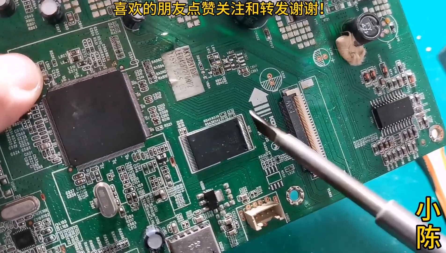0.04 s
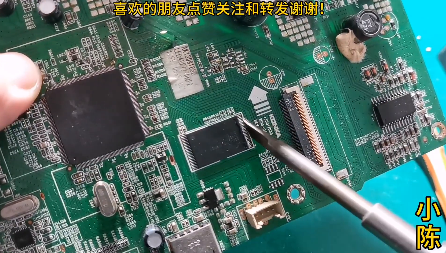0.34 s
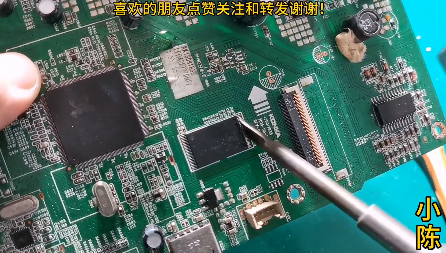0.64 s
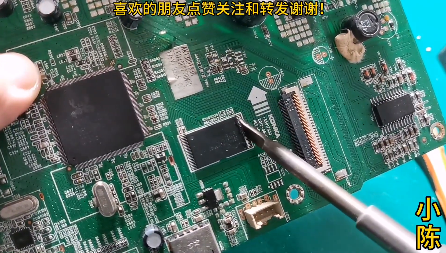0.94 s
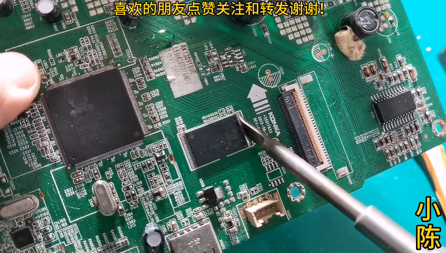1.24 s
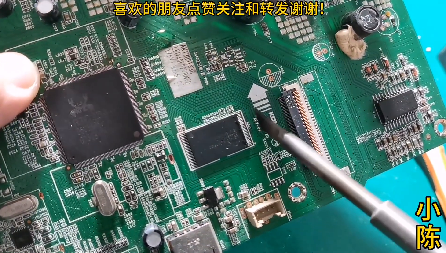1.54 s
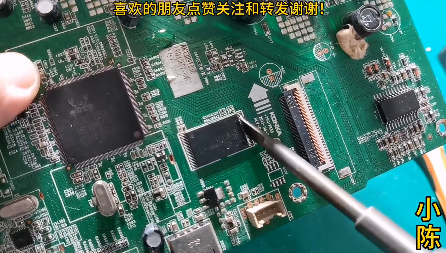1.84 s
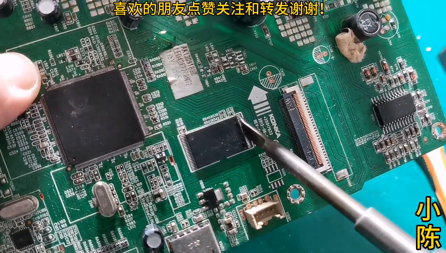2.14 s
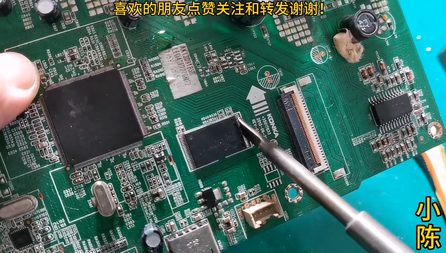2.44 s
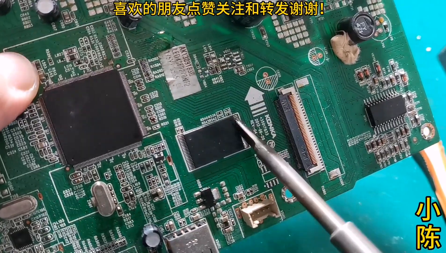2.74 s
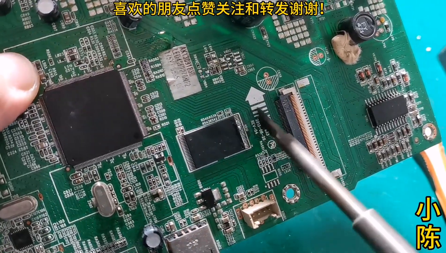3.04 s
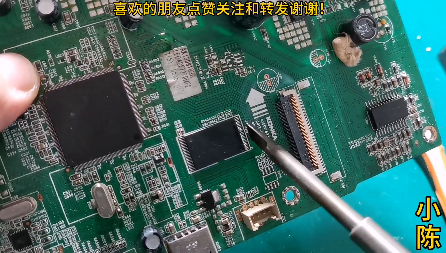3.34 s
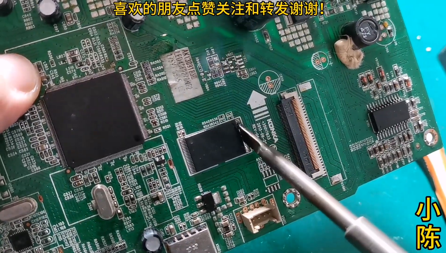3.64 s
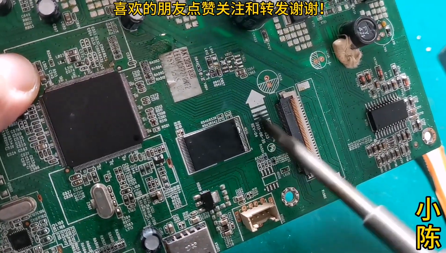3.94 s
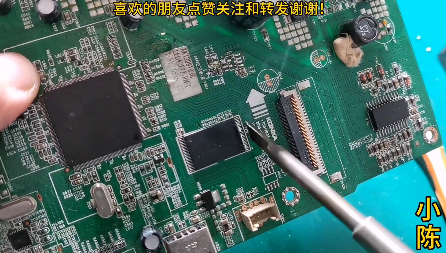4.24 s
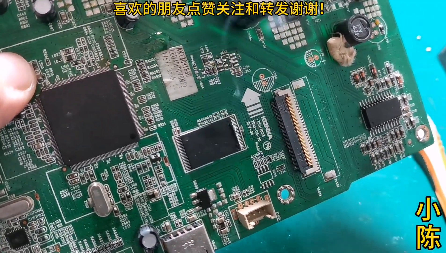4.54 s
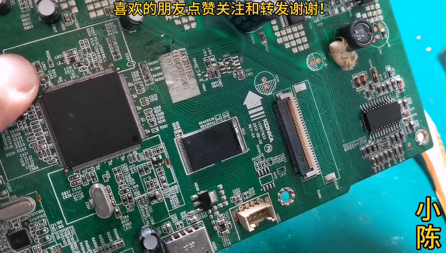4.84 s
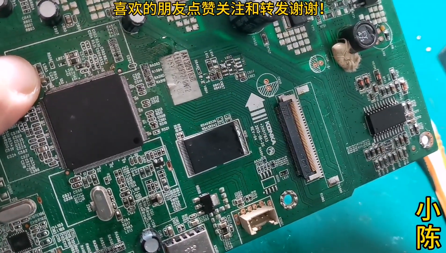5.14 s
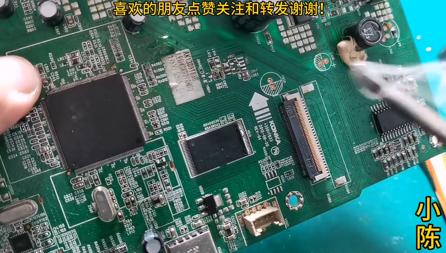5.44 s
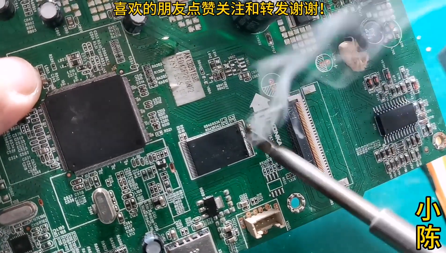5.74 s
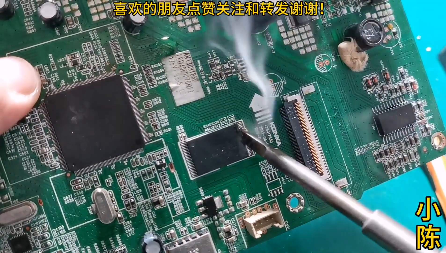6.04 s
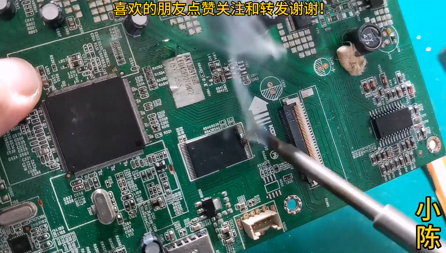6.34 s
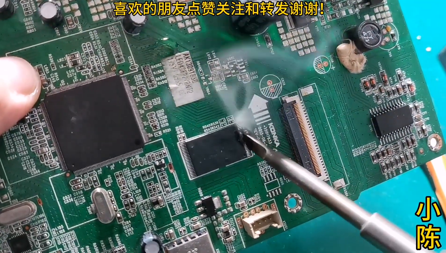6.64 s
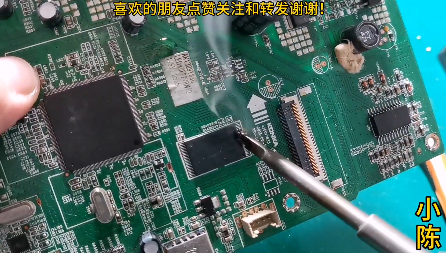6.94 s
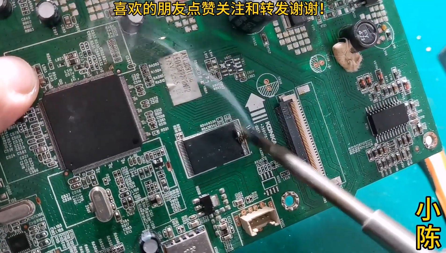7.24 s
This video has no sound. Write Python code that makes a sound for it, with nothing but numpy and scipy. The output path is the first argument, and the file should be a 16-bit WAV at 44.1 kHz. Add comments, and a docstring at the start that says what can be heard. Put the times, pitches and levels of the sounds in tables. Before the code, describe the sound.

Small clicks and a light rasp of a soldering iron on a circuit board, then flux hisses and spits briefly before more clicks.

```python
"""In a small room, a soldering iron works along the pins of a circuit board on a bench, near a phone.
Each impact excites the normal modes of board and bench: the tip ticks and skips over the pins, and once
drags across them with a rasp of tiny slips. Dipped in flux, it raises bubbles that burst in a hiss,
with puffs of vapour and spitting droplets; then it returns to the pins.
A low room rumble and mains hum lie underneath."""
import sys
import numpy as np
from scipy import signal
from scipy.fft import rfft, irfft, next_fast_len
from scipy.io import wavfile

SR = 44100
rng = np.random.default_rng(int(sys.argv[2]) if len(sys.argv) > 2 else 0)


def master(y):
    """Save y as 16-bit WAV."""
    cut = np.clip(np.atleast_2d(y).T, -1, 1)
    pcm = np.round(cut * 32767)  # scale
    wavfile.write(sys.argv[1], SR, pcm.astype(np.int16))


N = 330750

# room rumble: f/Hz, level/dB
RUMBLE_SPECTRUM = [(12, -16), (20, -2.5), (85, -5.5), (196, -2), (298, -7), (324, -5.5), (404, -7),
                   (478, -8.5), (581, -13), (746, -13.5), (1380, -22), (4680, -28.5), (5850, -34),
                   (11100, -37), (15500, -42)]
# likeness of the rumble at the two microphone ports: f/Hz, correlation
RUMBLE_COHERENCE = [(60, 0.3), (130, 0.61), (290, 0.69), (640, 0.25), (1410, -0.16), (3100, 0.082),
                    (6820, -0.054), (15000, -0.055)]
# balance of the rumble: f/Hz, left minus right/dB
RUMBLE_BALANCE = [(60, -2), (380, 1.5), (1300, -1), (5000, -0.5), (7600, -8), (9000, 3), (10500, 9.5),
                  (12500, 5.5), (15000, -2)]
# tones of the hum: f/Hz, level/dB
HUM_TONES = [(120, -74.5), (200, -74.5), (325, -75), (372, -76.5), (480, -76)]
# reverberation time of the room: f/Hz, t60/s
ROOM_DECAY = [(200, 0.077), (1000, 0.27), (4000, 0.24), (8000, 0.3), (14000, 0.28)]
# resonant response of each port: f/Hz, gain/dB
LEFT_RESPONSE = [(1000, -0.5), (3000, -2), (4600, 4), (5400, 0), (7000, -3), (7800, -20), (8850, 2),
                 (10000, 0.5), (11150, 4), (12650, 2), (14000, -4)]
RIGHT_RESPONSE = [(1000, -4.5), (3000, -3.5), (4500, 4), (6300, 5.5), (7050, 9.5), (7600, 8.5), (8200, 4),
                  (9300, -5.5), (10000, -10), (14000, -10)]

# short broad hisses: t/s, level/dB, t60/s
SHORT_HISSES = [(0, -51, 0.18), (0.624, -59.5, 0.12)]
# gentle simmer before and after the boil: start/s, stop/s, level/dB
SIMMER_SPANS = [(4.497, 4.77, -73.5), (5.465, 5.543, -66.5)]
# trains of vapour puffs: t/s, count, spacing/s, first level/dB
PUFF_TRAINS = [(4.788, 3, 0.03, -64), (5.359, 3, 0.021, -57.5), (5.437, 4, 0.021, -61),
               (5.603, 3, 0.033, -64.5)]
# bursting droplets of flux: t/s, level/dB, t60/s
DROPLET_BURSTS = [(4.976, -51.5, 0.039), (5.321, -32, 0.021), (5.5193, -38.5, 0.017), (5.538, -39, 0.01),
                  (5.5525, -55, 0.04), (6.0113, -39.5, 0.018)]
# spectra of the short hisses, the boil, the vapour and the droplets: f/Hz, level/dB
SHORT_HISS_SPECTRUM = [(400, -33), (1200, -7), (3000, -7.5), (6000, -5), (7700, -8), (8800, -6),
                       (10500, -14), (13000, -15), (14500, -34)]
BOIL_SPECTRUM = [(1500, -22), (3000, -8), (4500, -6), (6000, -6.5), (7300, 7), (8200, 0), (10000, 5.5),
                 (12000, 3), (14000, -2.5), (15500, -28)]
VAPOUR_SPECTRUM = [(2000, -23), (4000, -7), (6200, -9.5), (7100, 0), (7900, 5.5), (8600, -4.5),
                   (10500, -11), (15000, -20)]
DROPLET_SPECTRUM = [(800, -42), (2500, 1), (5000, -9), (7300, 15.5), (11000, 7.5), (13000, 10),
                    (15500, 6.5)]

# normal modes of the bench: f/Hz, level/dB, t60/s
BENCH_MODES = [(188.4, -8.5, 0.23), (218.4, -0.5, 0.16), (278.6, 3, 0.16), (348.7, -8.5, 0.24),
               (438.3, 1.5, 0.31), (457.7, -10, 0.24), (704, 0, 0.066), (785, -1.5, 0.1),
               (1103, -4.5, 0.36), (1091, -5.5, 0.28)]
# normal modes of the board: f/Hz, bandwidth/Hz, level/dB
BOARD_MODES = [(190, 61, -34), (278, 43, -6), (465, 29, 0.5), (710, 27, -5), (796.5, 32, 7),
               (1040, 130, -2), (1222, 235, 2.5), (1337, 35, 3), (1530, 220, 7.5), (1784, 198, 8.5),
               (2172, 340, 9.5), (2440, 1300, -33), (3140, 40, -1), (3880, 330, -6), (4710, 100, -14),
               (5110, 160, -16), (6000, 250, -53), (6700, 500, -53)]
# spectra of sliding friction and of impact noise: f/Hz, level/dB
RASP_SPECTRUM = [(400, -25), (750, -12), (1130, 4), (1450, -5.5), (1900, -5.5), (2360, 4.5), (2780, -6.5),
                 (3190, 2.5), (3530, -8), (4050, -7), (5300, -28), (7400, -23.5), (9000, -42), (14000, -37)]
CRACK_SPECTRUM = [(1000, -89), (2500, 12), (4500, -6.5), (7000, -3), (11000, -9.5), (15000, -35)]
# whistle of the slide, rising and falling with its speed: t/s, f/Hz
WHISTLE_PITCH = [(1.44, 10750), (1.56, 12240), (1.65, 12800), (1.74, 13850), (1.81, 12930), (1.87, 11500),
                 (1.93, 11300), (1.98, 9700)]
# thin tones of that whistle: ratio to its pitch, level/dB
WHISTLE_TONES = [(1, -82), (.63, -77), (.59, -81)]
# pushes on the bench, a softer one driving a lower pitch: t/s, level/dB, centre f/Hz
PUSHES = [(1.403, -44.5, 230), (2.254, -54.5, 940), (3.119, -40.5, 294), (4.078, -34.5, 450),
          (4.094, -43.5, 1030), (4.485, -49, 274), (4.523, -49.5, 350), (4.972, -41.5, 220),
          (5.258, -52, 630), (6.455, -38.5, 276), (6.46, -39, 784), (7.381, -51, 437), (7.388, -42, 188)]
# taps on single pins: t/s, level/dB, brightness/dB
PIN_TAPS = [(0.5978, -26, -3.5), (0.6656, -50.5, -11), (1.8743, -25, -4), (1.9229, -35, -4),
            (2.037, -45.5, -8), (2.0633, -35.5, 10), (2.2356, -51, 9), (2.2557, -29.5, -1),
            (3.1088, -36, 1), (3.7214, -48, -30), (4.5274, -53.5, 9), (4.9785, -48.5, 17),
            (5.3217, -40, 19.5), (6.0114, -40.5, 4.5), (6.0477, -48, 9), (6.5194, -39, -25),
            (6.7949, -54, 12), (7.3811, -33.5, -7)]
# skips: first t/s, last t/s, pins, slowing (1 = even), first level/dB, last level/dB, brightness/dB
PIN_SKIPS = [(1.4055, 1.4242, 2, 1, -36.5, -21, 2.5), (3.1178, 3.1807, 5, 1.38, -19.5, -34, -5.5),
             (4.0597, 4.0977, 4, 0.72, -19, -20.5, -1.5), (6.4359, 6.479, 3, 0.92, -21.5, -24, -0.5),
             (7.3877, 7.418, 3, 1.21, -24.5, -45, 0)]


def amp(db):
    """Amplitude ratio of a level in decibels."""
    return 10 ** (np.asarray(db) / 20)


def unit(x):
    """Normalisation to rms 1."""
    return x / np.sqrt(np.mean(x ** 2) + 1e-20)


def along(points, hz):
    """Interpolation of (f/Hz, value) points on a logarithmic frequency axis."""
    f, values = np.transpose(points)
    return np.interp(np.log(hz + 1), np.log(f + 1), values)


def wobble(rate):
    """Band-limited random fluctuation through rate knots a second."""
    knots = rng.standard_normal(int(N * rate / SR) + 4)
    fine = signal.resample(knots, len(knots) * 8)
    return np.interp(np.linspace(0, len(fine) - 1, N), np.arange(len(fine)), fine)


def swell(start_s, stop_s, attack_s, fade_db_per_s):
    """Envelope with an exponential approach from start_s and an exponential decay from stop_s."""
    t = np.arange(N) / SR
    rise = 1 - np.exp(-np.maximum(t - start_s, 0) / attack_s)
    return rise * amp(-fade_db_per_s * np.maximum(t - stop_s, 0))


def filtered(x, response):
    """Linear filtering: the spectrum of x times a frequency response."""
    size = x.shape[-1]
    padded = next_fast_len(size + 4096)
    return irfft(rfft(x, padded) * response(np.fft.rfftfreq(padded, 1 / SR)), padded)[..., :size]


def coloured(x, spectrum):
    """Spectral shaping by (f/Hz, level/dB) points, at rms 1."""
    return unit(filtered(x, lambda hz: amp(along(spectrum, hz))))


def noise(spectrum):
    """Two uncorrelated channels of coloured Gaussian noise."""
    return coloured(rng.standard_normal((2, N)), spectrum)


def grains(rate):
    """Shot noise: impulses of random size, on average rate a second, at rms 1."""
    return unit((rng.random((2, N)) < rate / SR) * rng.standard_normal((2, N)))


def add(track, s, sound):
    """Superposition of a sound on a track at s seconds."""
    start = max(round(s * SR), 0)
    part = track[:, start:start + sound.shape[-1]]
    part += sound[..., :part.shape[-1]]


def in_room(x, near_db, room_db, near_t60=0.029, apart_hz=900):
    """Reverberation: convolution with the direct path, scatter off the bench and the room's tail."""
    hz, t, spectra = signal.stft(rng.standard_normal((2, SR // 3)), SR, nperseg=256)
    tail = signal.istft(spectra * amp(-60 * t / along(ROOM_DECAY, hz)[:, None]), SR, nperseg=256)[1]
    t = np.arange(tail.shape[1]) / SR
    tail *= 1 - np.exp(-t / 0.00083)
    near = rng.standard_normal(tail.shape) * amp(-60 * t / near_t60) * (1 - np.exp(-t / 0.001))
    tail *= amp(room_db) / np.linalg.norm(tail[0])
    near *= amp(near_db) / np.linalg.norm(near[0])
    mid, side = tail + near
    side = filtered(side, lambda f: f / np.hypot(f, apart_hz))  # long waves reach both ports alike
    response = np.array([mid + side, mid - side]) / np.sqrt(2)
    response[:, 0] += 1  # direct path
    return signal.fftconvolve(x, response, axes=1)


def room_tone(rumble_db=-61.5):
    """Partial coherence: the rumble is most alike at both ports in the bass; a hum wavers in it."""
    angle = lambda hz: np.arccos(np.clip(along(RUMBLE_COHERENCE, hz), -1, 1)) / 2
    mid, side = filtered(noise(RUMBLE_SPECTRUM),
                         lambda hz: np.array([np.ones_like(hz), np.tan(angle(hz))]))
    balance = lambda hz: amp(np.outer([.5, -.5], along(RUMBLE_BALANCE, hz)))
    rumble = filtered(np.array([mid + side, mid - side]),
                      lambda hz: balance(hz) / np.sqrt(np.mean(balance(hz) ** 2, axis=0)))
    t = np.arange(N) / SR
    hum = sum(amp(db + 0.86 * wobble(3.4)) * np.sin(2 * np.pi * hz * t + 0.69 * wobble(6))
              for hz, db in HUM_TONES)
    return amp(rumble_db) * rumble + np.sqrt(2) * hum


def short_hisses():
    """Exponential decay of broad noise: one hiss dies at the start, one comes as the tip touches."""
    envelope, age = np.zeros((1, N)), np.arange(SR // 2) / SR
    for s, db, t60 in SHORT_HISSES:
        add(envelope, s, amp(db - 60 * age / t60))
    return envelope * noise(SHORT_HISS_SPECTRUM) * amp([[-2], [2]])


def vapour(puff_width_s=0.0027, puff_loss_db=2):
    """Incoherent sources add in power: a gentle simmer and weakening trains of vapour puffs."""
    t = np.arange(N) / SR
    simmer = sum(amp(db) * swell(start, stop, attack_s=0.01, fade_db_per_s=116)
                 for start, stop, db in SIMMER_SPANS)
    puffs = sum(amp(db - k * puff_loss_db) * np.exp(-.5 * ((t - s - k * gap_s) / puff_width_s) ** 2)
                for s, count, gap_s, db in PUFF_TRAINS for k in range(round(count)))
    return np.hypot(simmer * amp(1.4 * wobble(70)), puffs) * noise(VAPOUR_SPECTRUM)


def droplets():
    """Each bursting droplet radiates a noise transient with a steep rise and an exponential decay."""
    envelope, age = np.zeros((1, N)), np.arange(SR // 10) / SR
    for s, db, t60 in DROPLET_BURSTS:
        add(envelope, s, amp(db - 60 * age / t60) * (1 - np.exp(-age / 0.0001)))
    return envelope * noise(DROPLET_SPECTRUM)


def boil(dip_s=4.963, lift_s=5.287, lift_db=-45.5, swell_db_per_s=17, bubbles_per_s=9000):
    """Shot noise of bursting bubbles: a hiss that swells as the flux heats, until the tip lifts."""
    t = np.arange(N) / SR
    heat_db = lift_db + swell_db_per_s * np.minimum(t - lift_s, 0)
    envelope = swell(dip_s, lift_s, attack_s=0.034, fade_db_per_s=364)
    flicker_db = 1.1 * wobble(130) + 1.1 * wobble(35)
    return envelope * amp(heat_db + flicker_db) * coloured(grains(bubbles_per_s), BOIL_SPECTRUM)


def flux(echo_s=0.000753, echo_gains=(0.19, 0.059)):
    """Interference with a reflection off the bench combs the boil; vapour and droplets join it."""
    combed = filtered(boil(), lambda hz: 1 - np.outer(echo_gains, np.exp(-2j * np.pi * hz * echo_s)))
    return in_room(combed + vapour() + droplets(), near_db=-28, room_db=-13)[:, :N]


def drag(rasp_db=-53.5, body_db=-11, slips_per_s=3000, speed_exponent=4.7):
    """Stick-slip friction: tiny slips rasp through the board; speed drives them and a faint whistle."""
    pitch = np.interp(np.arange(N) / SR, *np.transpose(WHISTLE_PITCH))
    speed = pitch / pitch.max()
    stroke = swell(start_s=1.425, stop_s=1.9, attack_s=0.0073, fade_db_per_s=91)
    board = lambda f: sum(amp(db) * 1j * f * width / (hz * hz - f * f + 1j * f * width)
                          for hz, width, db in BOARD_MODES)
    body = unit(filtered(grains(slips_per_s)[:1], lambda f: board(f) * f ** 2 / (f ** 2 + 900 ** 2)))
    rasp = amp(body_db) * body + coloured(grains(slips_per_s), RASP_SPECTRUM)
    whistle = np.zeros(N)
    for ratio, db in WHISTLE_TONES:
        gain = amp(db + 1.8 * wobble(40.1))
        tone_hz = ratio * pitch * (1 + 0.012 * wobble(870))
        whistle += gain * np.sin(2 * np.pi * np.cumsum(tone_hz) / SR)
    rasp_gain = amp(rasp_db + 0.4 * wobble(49.56)) * speed ** speed_exponent
    return stroke * (rasp_gain * rasp + speed ** 2 * whistle)


def contacts(mid_run_db=2, sharpen_db=3):
    """Impacts of all taps and skips on the pins, as rows of t/s, level/dB, brightness/dB."""
    strikes = list(PIN_TAPS)
    for first_s, last_s, pins, slowing, first_db, last_db, bright_db in PIN_SKIPS:
        for k, progress in enumerate(np.linspace(0, 1, round(pins))):
            s = first_s + (last_s - first_s) * progress ** slowing
            db = first_db + (last_db - first_db) * progress ** 2
            db += mid_run_db * np.sin(np.pi * progress)  # the tip bears down in mid-skip
            strikes.append((s, db, bright_db + k * sharpen_db))  # each further pin is hit more sharply
            if k:
                strikes.append((s - 0.005, db - 7.5, bright_db))  # the moving tip catches the edge
                strikes.append((s + 0.0048, db - 10.5, bright_db))  # and rebounds after the strike
    return strikes


def knocks(push_db_per_octave=16, hollow_db_per_octave=32, hollow_hz=724, hollow_db=-21):
    """Modal excitation of the bench: pushes ring a broad band, pin contacts only its hollow modes."""
    out, t = np.zeros((2, N)), np.arange(SR // 3) / SR
    hz, db, t60 = np.transpose(BENCH_MODES)[:, :, None]
    modes = amp(db - 60 * t / t60) * np.sin(2 * np.pi * hz * t) * (1 - np.exp(-t / 0.0013))
    pushes = [(s, level_db, centre_hz, push_db_per_octave) for s, level_db, centre_hz in PUSHES]
    hollow = [(s, level_db + hollow_db, hollow_hz, hollow_db_per_octave)
              for s, level_db, _ in contacts()]
    for s, level_db, centre_hz, slope in pushes + hollow:
        octaves_away = np.abs(np.log2(hz / centre_hz))
        strength = amp(level_db - slope * octaves_away + rng.standard_normal(hz.shape))
        add(out, s, in_room((strength * modes).sum(0)[None], near_db=-3.5, room_db=-16.5))
    return out


def ticks(scatter_db=2, ring_db=-8, crack_db=-18, crack_t60=0.0088, rise_db=-19, rise_s=0.0015):
    """Free vibration of the board after each strike; sharper impacts favour the high modes."""
    out, t = np.zeros((2, N)), np.arange(SR // 20) / SR
    hz, width, db = np.transpose(BOARD_MODES)[:, :, None]
    treble = 1 / (1 + (3000 / hz) ** 6)
    impact_noise = noise(CRACK_SPECTRUM)
    lead = SR // 150  # samples before the tick
    for i, (s, level_db, bright_db) in enumerate(contacts()):
        strength = width * amp(db + scatter_db * rng.standard_normal(hz.shape))
        pitch = hz * (1 + 0.018 * rng.standard_normal(hz.shape))
        # short waves reach the two ports out of step
        phase = rng.standard_normal((2,) + hz.shape) * (hz / 4000) ** 2
        envelope = np.exp(-np.pi * width * t) * (1 - np.exp(-t / 0.00032))
        modes = strength * envelope * np.sin(2 * np.pi * pitch * t + phase)
        low_modes = (modes * (1 - treble)).sum(1)
        modes /= np.std(low_modes[:, :lead // 2])  # the low modes carry the strength of the blow
        ring = -amp(ring_db) * (modes * amp(bright_db * treble)).sum(1)
        grit = amp(bright_db) * impact_noise[:, i * len(t):(i + 1) * len(t)]
        crack = amp(crack_db - 60 * t / crack_t60) * grit
        fading_grit = np.exp(-t / rise_s) * grit[:, ::-1]
        rise = amp(rise_db) * fading_grit[:, lead - 1::-1]  # a faint noise swells into each tick
        tick = np.hstack([rise, ring + crack])
        add(out, s - lead / SR, amp(level_db) * in_room(tick, near_db=-6.5, room_db=-10.0))
    return out


def scene(right_lag_s=0.00006):
    """Superposition at two differently resonant ports, the board a little nearer the left one."""
    delay = lambda hz: np.exp(-2j * np.pi * np.outer([0, right_lag_s], hz))
    radiation = lambda hz: (1j * hz / (1j * hz + 70)) ** 2  # small parts give off no deep bass
    ports = lambda hz: amp([along(LEFT_RESPONSE, hz), along(RIGHT_RESPONSE, hz)])
    on_board = filtered(ticks() + knocks() + drag(), delay)
    work = filtered(on_board + flux(), lambda hz: radiation(hz) * ports(hz))
    return work + short_hisses() + room_tone()


def record(dry):
    """Band limiting: the phone acts as a steep low-pass filter."""
    cutoff_hz = 15500
    return filtered(dry, lambda hz: 1 / (1 + (hz / cutoff_hz) ** 120))


dry = scene()
out = record(dry)
master(out)
```